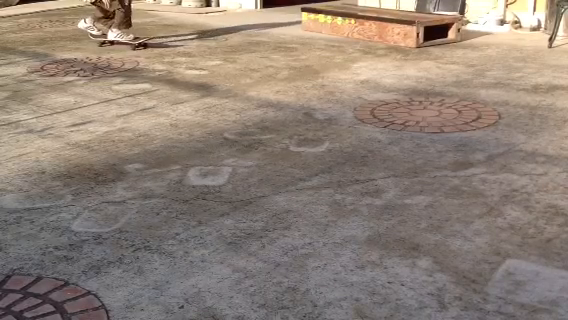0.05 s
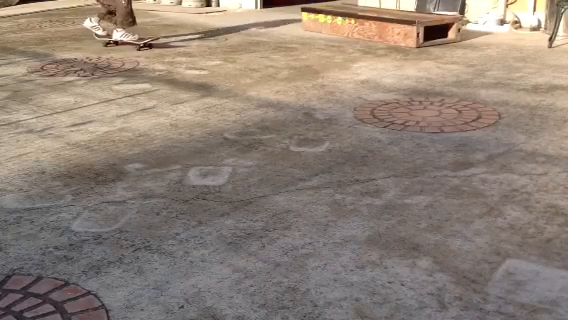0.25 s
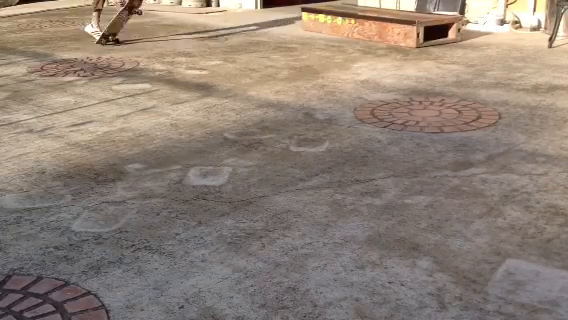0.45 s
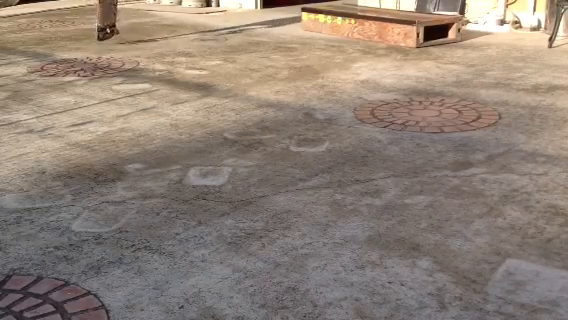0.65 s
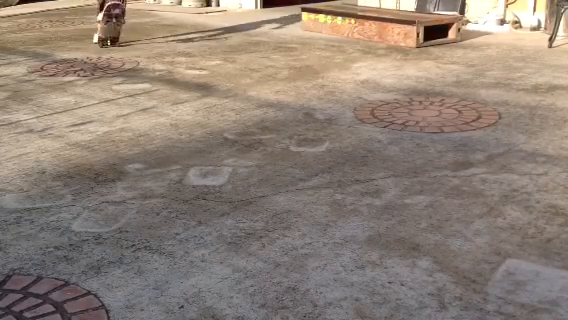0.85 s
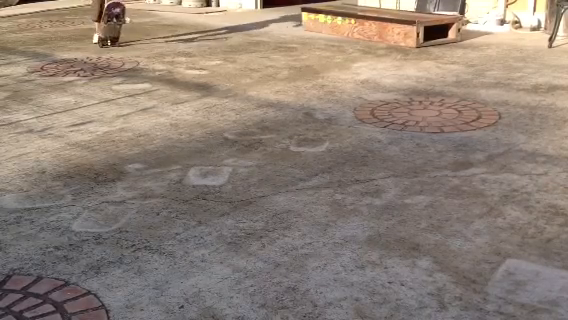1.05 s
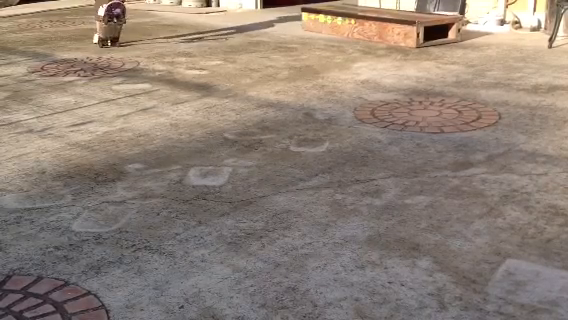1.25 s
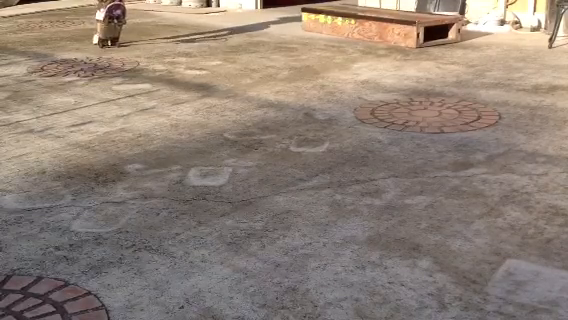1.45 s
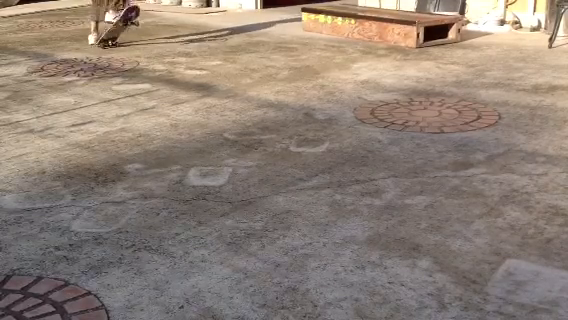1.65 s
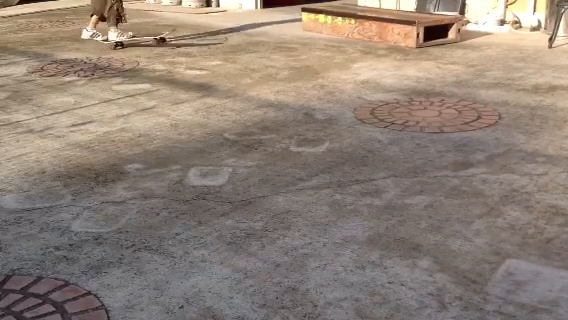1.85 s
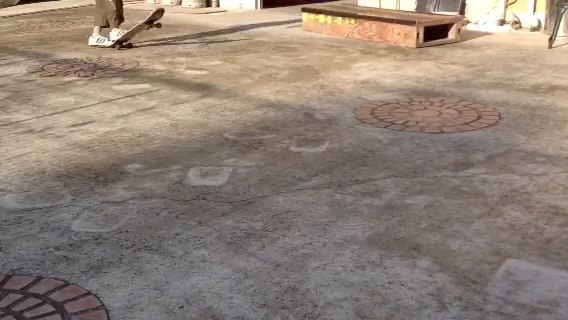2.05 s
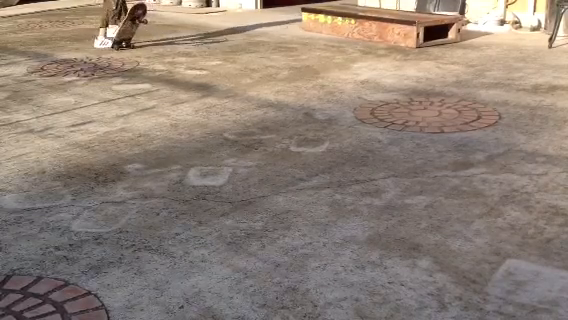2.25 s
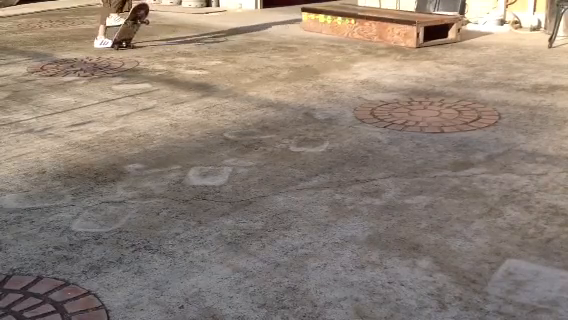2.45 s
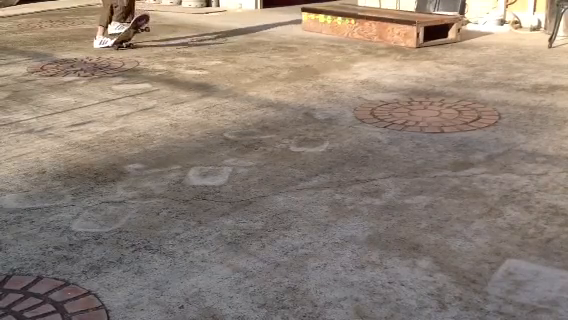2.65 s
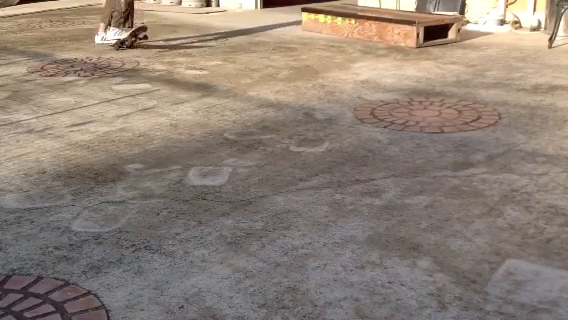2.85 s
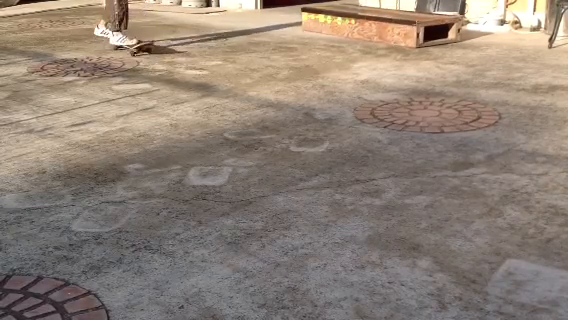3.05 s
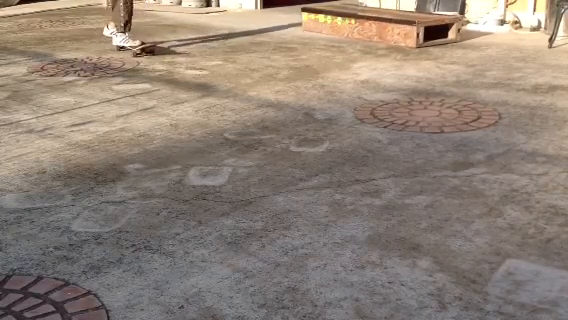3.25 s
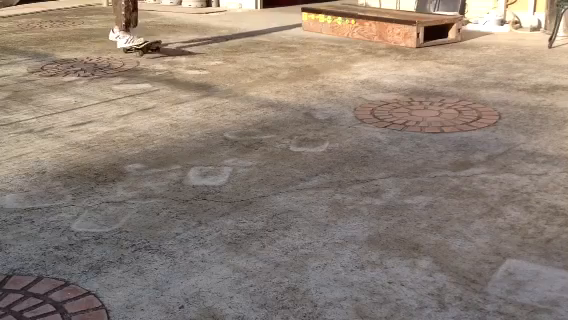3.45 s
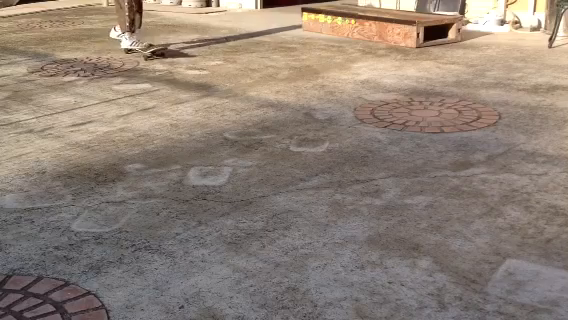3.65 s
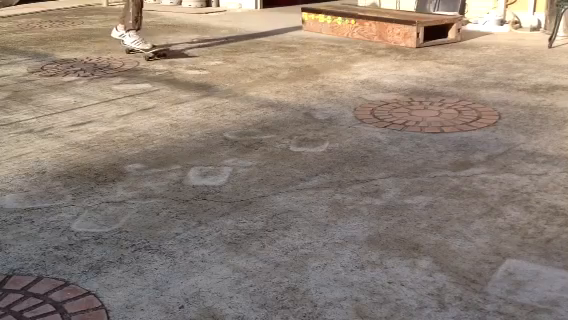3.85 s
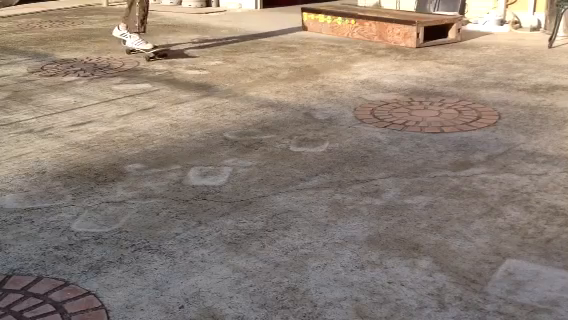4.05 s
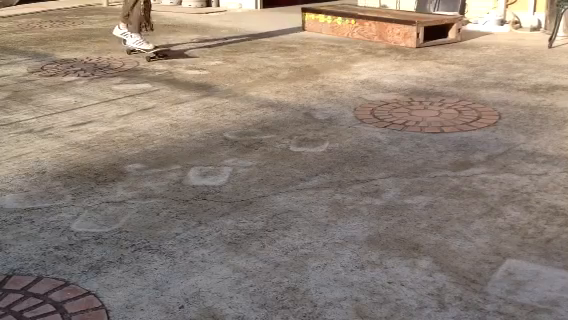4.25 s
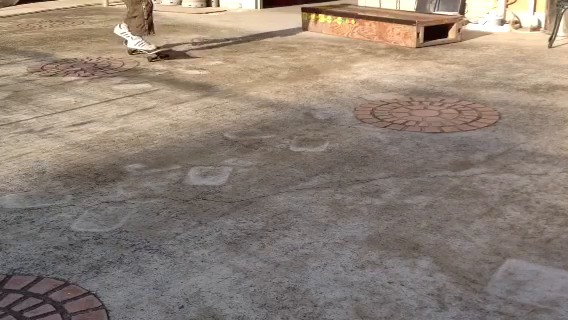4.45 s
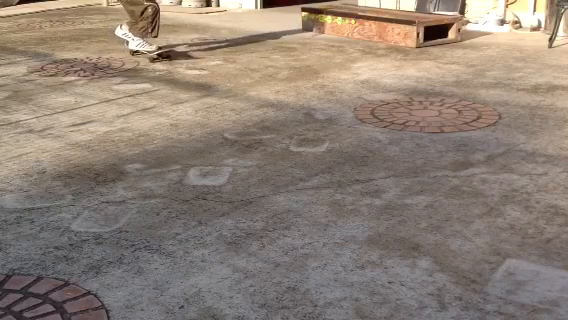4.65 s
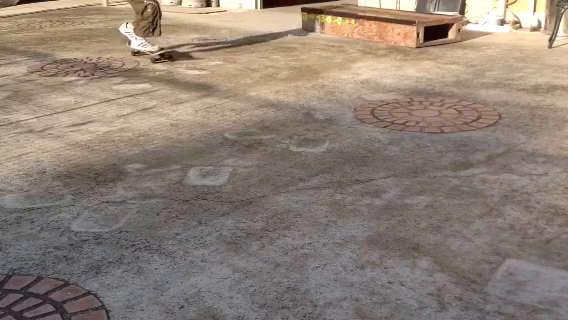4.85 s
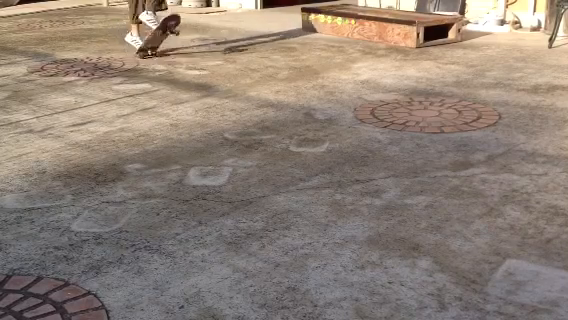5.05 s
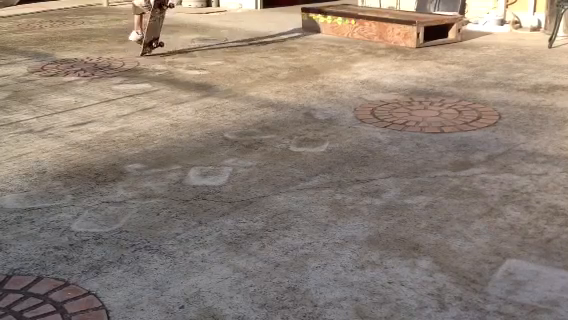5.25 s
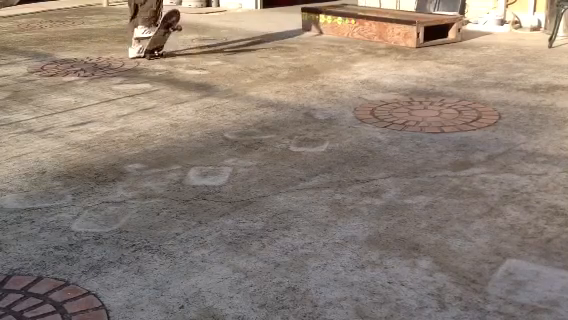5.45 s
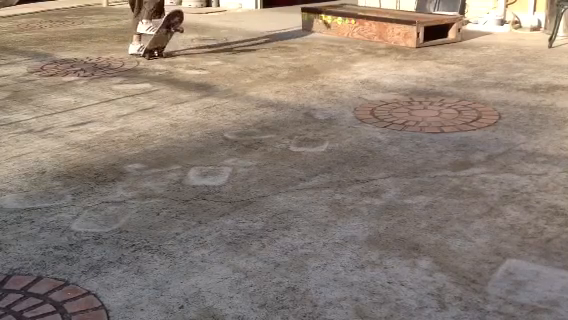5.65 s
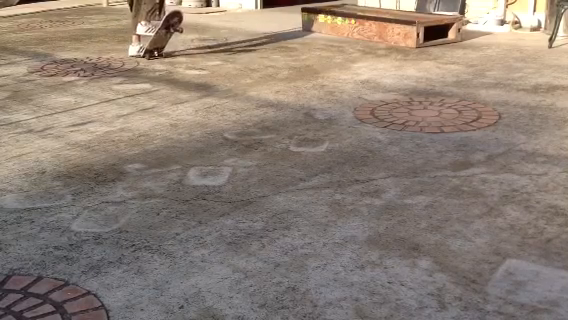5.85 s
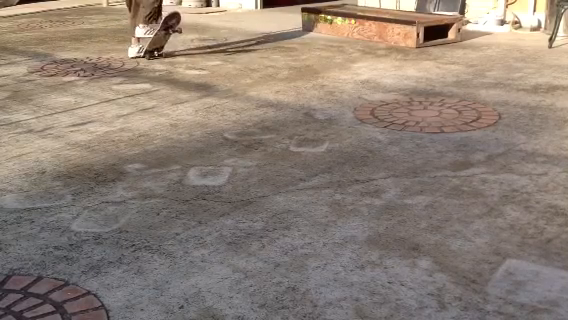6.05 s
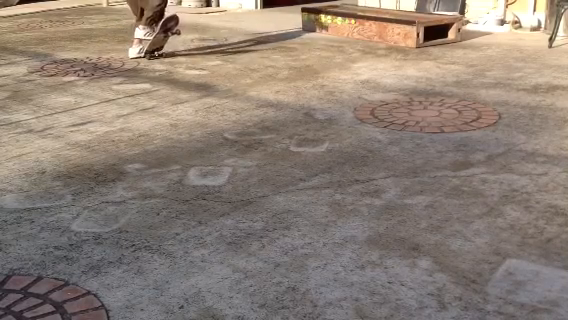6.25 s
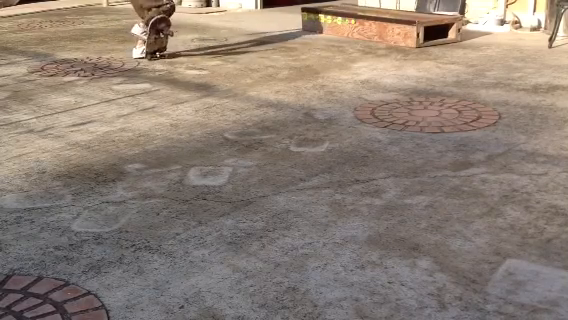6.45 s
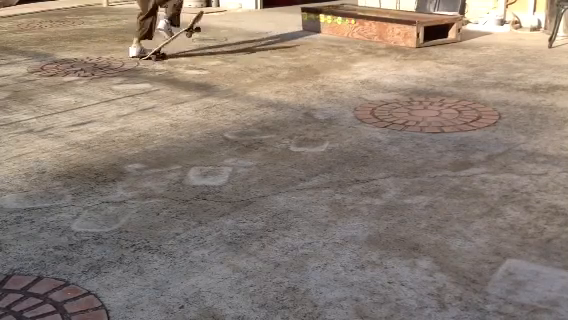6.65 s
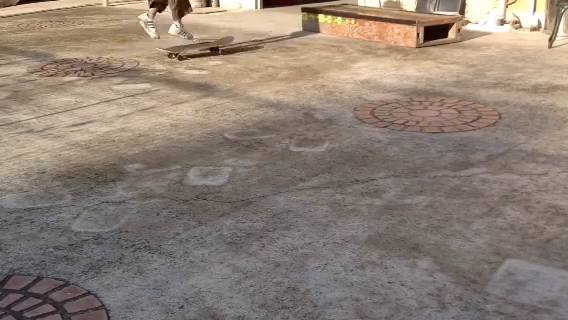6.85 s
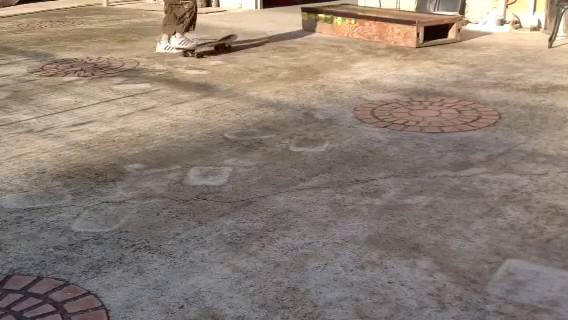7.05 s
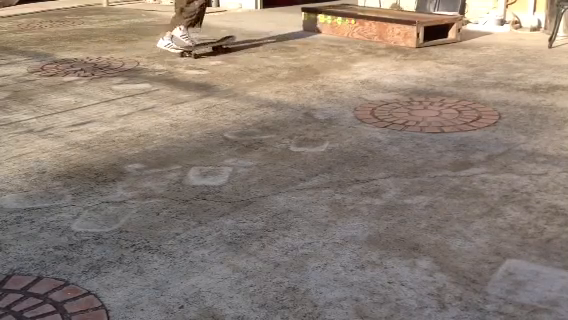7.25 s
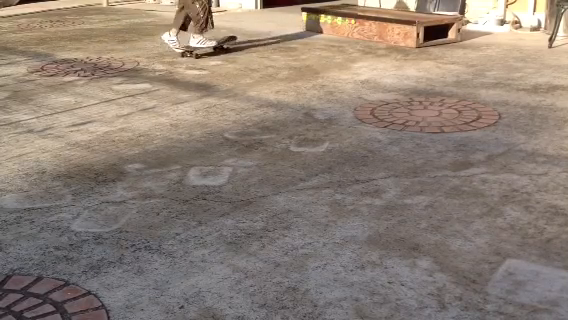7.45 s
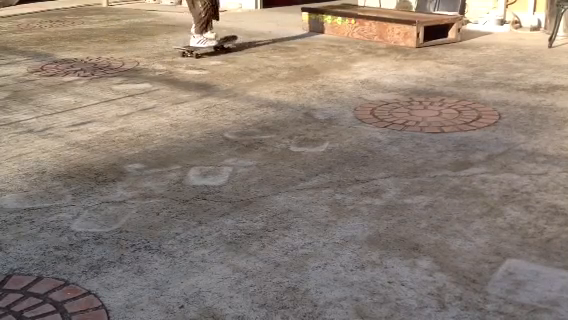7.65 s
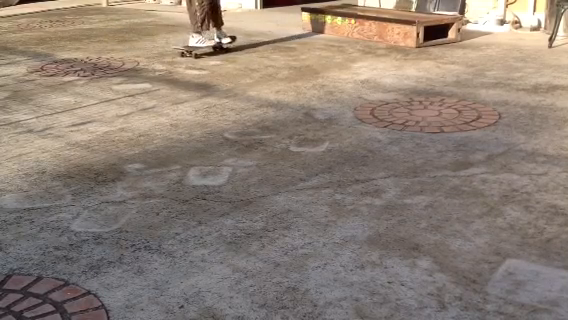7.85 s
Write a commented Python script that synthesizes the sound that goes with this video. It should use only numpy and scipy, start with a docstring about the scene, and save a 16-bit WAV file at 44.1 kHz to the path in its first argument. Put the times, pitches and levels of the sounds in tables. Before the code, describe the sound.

A skateboard slams on concrete in three bursts of hard wooden cracks, with shoe scuffs and small clacks between, over faint traffic and recorder whine.

```python
"""A disc drive whines and ticks over distant traffic; then shoes scuff and a skateboard slams on concrete.
The camcorder some metres away hears its own drive: tones and ticks under a resonance sweeping each disc turn.
Blows ring the deck's modes and rattle its metal trucks as filtered clicks; sparse taps make the after-sound.
Scuffs are clumped clicks, the squeak is a rough falling tone, traffic and hiss are shaped noise.
The recorder cuts bass, rides its gain, limits softly and cuts the top."""
import sys
import numpy as np
from scipy import signal
from scipy.fft import rfft, irfft
from scipy.io import wavfile
from scipy.ndimage import uniform_filter1d

SR = 44100
rng = np.random.default_rng(int(sys.argv[2]) if len(sys.argv) > 2 else 0)


def wrap_up_sound(samples):
    """Save the sound to the file named by the first command line argument, as 16-bit audio."""
    columns = np.atleast_2d(samples).T
    # keep every value between -1 and 1, then stretch to whole-number steps
    tamed = np.clip(columns, -1, 1)
    steps = np.round(tamed * 32767).astype(np.int16)
    wavfile.write(sys.argv[1], SR, steps)


N = 348831

# traffic and hiss spectrum: (frequency [Hz], relative density [dB per Hz])
FLOOR_SPECTRUM = [(18, -52), (30, -40.5), (164, 1), (359, -8), (467, -10), (546, -8.5), (808, -11.5),
                  (1230, -10), (3230, -15.5), (4420, -17), (5040, -12), (6370, -8.5), (9190, -18),
                  (14000, -14), (15500, -18.5)]
FLOOR_RMS_DB = -47.5  # before the recorder

# drive tones: (frequency at the reference motor speed [Hz], rms before WHINE_GAIN_DB and waver [dB])
WHINE_TONES = [(4716, -73), (5098, -71), (5480, -70), (5669, -78), (5862, -67), (5922, -76), (6067, -76),
               (6255, -68), (6288, -73), (6476, -75), (6611, -71), (6858, -78), (7047, -75), (7267, -80),
               (7445, -79), (7634, -80), (7827, -78), (8005, -78), (10008, -84), (10562, -83), (10772, -83),
               (10950, -82), (11326, -82), (11709, -83), (14137, -80), (14325, -78), (14519, -79),
               (14713, -79), (14906, -79)]
# motor speed, two ticks a turn; second row is the reference: (time [s], speed [turns/s])
MOTOR_SPEED = [(0, 188.33), (4.6, 190.7), (8, 192.45)]
# disc angle polynomial: (start [turns], speed [turns/s], quadratic term [turns/s^2])
DISC_ANGLE = (-.27, 14.97, .0115)
# motor tick spectrum: (frequency [Hz], relative density [dB per Hz])
TICK_SPECTRUM = [(4000, -41), (7800, -5), (10000, -30), (12500, -17), (14300, 0.5), (16000, -6.5)]
WHINE_GAIN_DB, TICK_RMS_DB = 4.0, -55.0
SWEEP_MID_HZ, SWEEP_SWING_HZ, SWEEP_WIDTH_HZ = 6440.0, 1300.0, 1100.0

# rubber slipping on the deck: (start [s], length [s], from [Hz], to [Hz], peak [dB])
SQUEAK = (6.552, 0.05, 1900, 1150, -47)

# soles and wheels scuffing: (start [s], rise [s], fall [s], top level [dB],
# treble relative to top [dB], rasp [Hz])
SCUFFS = [(0.2, 0.22, 0.088, -51, -18, 1220), (0.685, 0.029, 0.08, -32.5, -17, 990),
          (0.95, 0.09, 0.11, -48, -24, 1850), (1.39, 0.018, 0.1, -43, -27, 1320),
          (1.67, 0.039, 0.12, -46.5, -0.5, 1900), (1.76, 0.073, 0.017, -41.5, -18, 1000),
          (3.055, 0.02, 0.17, -42.5, -19, 1910), (3.25, 0.15, 0.23, -48, -25, 683),
          (4.86, 0.13, 0.32, -48, -17, 990), (5.26, 0.027, 0.2, -45, -13, 900),
          (5.573, 0.0098, 0.2, -44, -6, 1500), (6.522, 0.15, 0.23, -34, -6.5, 990),
          (6.76, 0.09, 0.18, -45.5, -17, 1000), (7.05, 0.3, 0.35, -49, -15, 900),
          (7.412, 0.015, 0.033, -37.5, -22, 920), (7.79, 0.022, 0.6, -52.5, -10, 710)]
# scuff spectra, into the deck and hissing above: (frequency [Hz], relative density [dB per Hz])
SCUFF_BODY = [(88, -54), (150, -14), (282, -12.5), (342, -42), (382, -11), (859, -8.5), (1410, -9),
              (4000, -21), (5200, -36), (8800, -120)]
SCUFF_TREBLE = [(1500, -49), (3000, -1), (5000, -1), (8000, -8), (11000, -13), (15000, -18)]
SCUFF_RANGE_DB = 21.5  # rise and fall span, apart from the short fade at the ends
RASP_DB, RASP_WIDTH = 5.5, 0.3  # lift; half-width in log frequency

# decay by band, before the wall fades: (frequency [Hz], t60 [s])
WALL_T60 = [(150, 0.47), (500, 0.46), (1500, 0.48), (4000, 0.43), (10000, 0.37)]
NEAR_WALL_S, FAR_WALL_S, ANSWER_S = 0.0058, 0.026, 0.0027  # arrivals; build-up
NEAR_FADE_S, FAR_FADE_S, FAR_DB = 0.042, 0.061, -9.5  # far relative to near
LOT_DB, LINGER_DB_PER_S, LINGER_FROM_S = -2, 72, 0.16  # scattered sound of the whole lot

# deck modes: (centre frequency [Hz], relative level before ring lift and scatter [dB], t60 [s])
DECK_MODES = [(180, -35, 0.02), (211, 2.5, 0.26), (311.7, 9, 0.12), (365, -5.5, 0.16), (513.5, 5.5, 0.15),
              (603, 6.5, 0.07), (721.5, -4.5, 0.24), (821, 6, 0.12), (1003, 18, 0.017), (1216, 16.5, 0.038),
              (1483, 3.5, 0.068), (1689, 15.5, 0.028), (1890, 9.5, 0.057), (2337, 5.5, 0.059),
              (2614, 1.5, 0.039), (3160, -2.5, 0.023), (3233, 4.5, 0.022), (3676, 0, 0.029),
              (4234, -2, 0.024), (4540, -84, 0.0073), (4810, -2, 0.017), (4930, -46, .01),
              (6800, -13, 0.033), (6400, -19, 0.0068)]
SPREAD_S = 0.0012  # longest bending-wave travel at 1 kHz; high tones run faster
ANGLE_BLUR = 0.075  # half-width of the spectral blur, share of frequency
RING_DB, RING_T60_S, RING_DELAY_S = -21, 0.21, 0.002  # one clear note, relative to the peak

# truck chatter spectrum: (frequency [Hz], relative density [dB per Hz])
RATTLE = [(2060, -12), (3500, -12.5), (4090, -9.5), (7340, -7.5), (7960, -9), (10400, -12), (15500, -19)]

# tail and wheels slammed on concrete; after-sound is how strongly each blow rumbles on:
# (time [s], knock peak [dB], loudest ring [Hz],
# then relative to the peak: thud [dB], crack [dB], rattle [dB], after-sound [dB])
SLAMS = [(0.486, -7, 553, -22, -10.5, -26, -3.5), (0.736, -2.5, 534, -22.5, -17.5, -35, -4.5),
         (0.808, 0.5, 1016, -30, -38, -31.5, -12), (1.841, -3.5, 660, -34, -19, -18, -5),
         (5.1202, -2.5, 1426, -25.5, -16, -32.5, -7), (5.382, -3.5, 497, -15, -22, -25.5, -12),
         (5.391, -9.5, 498, -9, -17.5, -23.5, -8), (5.48, -13.5, 1057, -46, -16.5, -25, -6),
         (6.909, -16, 1198, -38, -13, -17, 9), (6.922, -0.5, 666, -25, -22, -19.5, -3.5)]
# bounces and shoe taps; a loose deck thuds and rattles more than a held one:
# (time [s], knock peak [dB], loudest ring [Hz], looseness [dB], after-sound [dB])
TAPS = [(0.694, -33.5, 950, -15, 6), (0.768, -20, 990, -10, 0.5), (0.802, -13, 458, -20, -3.5),
        (0.865, -30.5, 900, -7.5, -20), (0.901, -22.5, 1030, -38, -24), (0.963, -24.5, 880, -43, -2),
        (1.028, -32.5, 1810, -30, 4.5), (1.053, -25.5, 1850, -21, -17), (1.192, -30, 880, -37, -8),
        (1.238, -33.5, 1840, -45, -0.5), (1.373, -38, 563, -32, 1), (1.403, -33.5, 1230, -37, -14),
        (1.5, -34, 729, -31, -11), (1.693, -36, 1850, -27, -9), (1.887, -15, 710, -18, -8.5),
        (1.999, -21, 564, -21, 4.5), (2.015, -22.5, 1220, -15.5, -2), (2.043, -27, 605, -16, -8),
        (2.165, -20.5, 905, -22.5, 0), (2.176, -22, 890, -20, -8), (2.203, -20, 436, -24, -10),
        (2.219, -23.5, 490, -30, -5), (2.355, -35.5, 1840, -29, -2), (2.386, -30, 1280, -33, -7.5),
        (2.456, -35.5, 1880, -33, -1.5), (2.586, -24.5, 526, -26, 2), (3.044, -26.5, 1230, -16.5, -13),
        (3.137, -31, 707, -14.5, -2.5), (3.286, -48.5, 596, -14.5, 19), (3.69, -26, 590, -20, -17),
        (3.703, -21.5, 1123, -17, -0.5), (3.91, -36, 1290, -59, -5), (4.22, -35.5, 1280, -18.5, -3),
        (4.949, -30, 500, -16, -2.5), (4.985, -30.5, 493, -20, 0), (5.257, -20.5, 542, -16.5, -0.5),
        (5.304, -18.5, 468, -25, -1), (5.345, -28, 850, -20, -21), (5.414, -15, 485, -19.5, -0.5),
        (5.567, -24.5, 1000, -17.5, -3.5), (5.588, -24, 1960, -35, -4), (5.961, -38, 834, -29, -12),
        (6.435, -29.5, 870, -26, -0.5), (6.465, -35, 1300, -26, -8), (6.974, -7.5, 727, -25, -14),
        (7.039, -20, 626, -19.5, 3.5), (7.431, -22, 1010, -17.5, 0), (7.465, -28, 488, -36, -3),
        (7.802, -39, 630, -12, 2)]
TAP_CRACK_DB, TAP_THUD_DB = -20.5, 1  # crack relative to peak; thud relative to looseness

EDGE_HZ = 15320  # recorder's upper band limit


def gain_of(db):
    """Decibels to an amplitude factor."""
    return 10 ** (np.asarray(db) / 20)


def evened(x):
    """Scales to rms 1."""
    return x / np.sqrt(np.mean(x ** 2) + 1e-20)


def read(points, hz):
    """Interpolates a spectrum table on a log frequency axis."""
    f, value = np.transpose(points)
    return np.interp(np.log(hz + 1), np.log(f + 1), value)


def add(mix, start_s, sound):
    """Mixes a sound in place from start_s, cut at the end of the mix."""
    part = mix[round(start_s * SR):][:len(sound)]
    part += sound[:len(part)]


def coloured(x, spectrum):
    """Filters by a spectrum table, then scales to rms 1."""
    hz = np.fft.rfftfreq(len(x), 1 / SR)
    return evened(irfft(rfft(x) * gain_of(read(spectrum, hz)), len(x)))


def grit(length, per_s, spread_db):
    """Sparse random clicks of uneven size."""
    size = gain_of(spread_db * np.minimum(rng.exponential(1, length), 4))
    hit = rng.random(length) < per_s / SR
    return size * rng.standard_normal(length) * hit


def floor():
    """Distant traffic and microphone hiss: shaped noise whose level drifts in time-frequency patches."""
    frames, hz = N // 256 + 5, np.fft.rfftfreq(1024, 1 / SR)
    real, imag, patches = rng.standard_normal((frames, 513, 3)).T
    patches = uniform_filter1d(patches, 10, 0)
    patches = evened(uniform_filter1d(patches, 16, 1))
    level_db = read(FLOOR_SPECTRUM, hz)[:, None] + 1.04 * patches
    noise = signal.istft((real + 1j * imag) * gain_of(level_db), nperseg=1024, noverlap=768)[1][:N]
    return gain_of(FLOOR_RMS_DB) * evened(noise)


def drive():
    """Whining tones lifted by a resonance that sweeps once a disc turn; motor ticks swell at its top."""
    t = np.arange(N) / SR
    motor_turns = np.cumsum(np.interp(t, *np.transpose(MOTOR_SPEED))) / SR
    disc_turns = np.polyval(DISC_ANGLE[::-1], t)
    swing = np.cos(2 * np.pi * (disc_turns + 0.02))
    sweep_hz = SWEEP_MID_HZ + SWEEP_SWING_HZ * swing
    reference_speed = MOTOR_SPEED[1][1]
    whine = np.zeros(N)
    for hz, rms_db in WHINE_TONES:
        waver = evened(uniform_filter1d(rng.standard_normal(N), 5000))
        turn_phase = 2 * np.pi * hz / reference_speed * motor_turns
        phase = turn_phase + 0.35 * waver + 2 * np.pi * rng.random()
        octave = 2 if hz > 9000 else 1  # the sweep also sounds an octave up
        detune = (hz / octave - sweep_hz) / SWEEP_WIDTH_HZ
        lift = evened(0.34 + np.exp(-detune ** 2))
        whine += np.sqrt(2) * gain_of(rms_db + 1.8 * waver) * lift * np.sin(phase)
    strong_ticks = np.exp(-(motor_turns % 1) / 0.18)
    weak_ticks = 0.51 * np.exp(-((motor_turns + 0.5) % 1) / 0.13)
    swelling = (strong_ticks + weak_ticks) * np.exp(1.3 * swing)
    ticks = coloured(swelling * rng.standard_normal(N), TICK_SPECTRUM)
    return gain_of(WHINE_GAIN_DB) * whine + gain_of(TICK_RMS_DB) * ticks


def squeak():
    """Rubber slips on the deck: a short rough tone that falls as it slows."""
    start_s, length_s, from_hz, to_hz, peak_db = SQUEAK
    out, t = np.zeros(N), np.arange(0, length_s, 1 / SR)
    glide_hz = from_hz * (to_hz / from_hz) ** (t / length_s)
    roughness = 0.34 * uniform_filter1d(rng.standard_normal(N), 60)[:len(t)]
    tone = np.sin(2 * np.pi * np.cumsum(glide_hz * (1 + roughness)) / SR)
    add(out, start_s, gain_of(peak_db) * np.sin(np.pi * t / length_s) * tone)
    return out


def scuffs():
    """Sand grains slip under rubber: clumped clicks into the deck, others hissing above."""
    out = np.zeros(N)
    clumps = gain_of(1.0 * evened(uniform_filter1d(rng.standard_normal(N), 400)))
    body = clumps * coloured(grit(N, 7000., 0.37), SCUFF_BODY)
    treble = clumps * coloured(grit(N, 9000., 0.81), SCUFF_TREBLE)
    for start_s, rise_s, fall_s, level_db, treble_db, rasp_hz in SCUFFS:
        length_s = rise_s + fall_s
        at = slice(round(start_s * SR), min(round((start_s + length_s) * SR), N))
        t = np.arange(at.stop - at.start) / SR
        press = np.clip(np.minimum(t / rise_s, (length_s - t) / fall_s), 0, 1)
        level = gain_of(level_db - SCUFF_RANGE_DB * (1 - press)) * np.minimum(10 * press, 1)
        low_hz, high_hz = rasp_hz * np.exp(-RASP_WIDTH), rasp_hz * np.exp(RASP_WIDTH)
        rasp = coloured(body[at], [(low_hz, 0), (rasp_hz, RASP_DB), (high_hz, 0)])
        out[at] += level * (rasp + gain_of(treble_db) * treble[at])
    return out


def walls():
    """Random-sign echoes that swell as each wall answers, each band dying at its own speed."""
    taps = np.zeros(SR // 2)
    slots = np.arange(0, len(taps) - 16, 16)
    taps[slots + rng.integers(0, 16, len(slots))] = rng.choice([-1., 1.], len(slots))
    hz, t, z = signal.stft(taps, SR, nperseg=256)
    band_decay = gain_of(-60 * t / read(WALL_T60, hz)[:, None])
    tail = signal.istft(z * band_decay, SR, nperseg=256)[1]
    t = np.arange(len(tail)) / SR
    near = np.clip((t - NEAR_WALL_S) / ANSWER_S, 0, 1)
    far = np.clip((t - FAR_WALL_S) / ANSWER_S, 0, 1)
    near_answer = near * np.exp(-(t - NEAR_WALL_S) / NEAR_FADE_S)
    far_answer = far * gain_of(FAR_DB) * np.exp(-(t - FAR_WALL_S) / FAR_FADE_S)
    lot = gain_of(LOT_DB + LINGER_DB_PER_S * np.maximum(t - LINGER_FROM_S, 0))
    tail = tail * (near_answer + far_answer + (near + far) / 2 * lot)
    return tail / np.linalg.norm(tail)


def all_round(x):
    """Energy leaves the deck on all sides: the blow's power spectrum blurred over frequency, zero phase."""
    summed, at = np.cumsum(abs(rfft(x)) ** 2), np.arange(len(x) // 2 + 1)
    reach = 1 + ANGLE_BLUR * at
    power = (np.interp(at + reach, at, summed) - np.interp(at - reach, at, summed)) / (2 * reach)
    return np.roll(irfft(np.sqrt(power)), 128)[:1024]  # pulse centred 128 samples in


def trucks(rattle_db):
    """Loose washers and bearings chatter after a blow: clicks under a two-rate decay."""
    t = np.arange(8192) / SR
    chatter = coloured(grit(len(t), 2500., 1.03), RATTLE)
    decay = gain_of(-60 * t / 0.056) + 0.42 * gain_of(-60 * t / 0.15)
    return gain_of(rattle_db) * chatter * decay


def deck(peak_db, ring_hz, thud_db, crack_db):
    """Struck plywood: decaying modes, each a cluster of five, loudest near ring_hz."""
    hz, db, t60_s = np.repeat(np.transpose(DECK_MODES), 5, axis=1)[:, :, None]
    t = np.arange(4096) / SR
    ring_lift_db = 11.1 * np.exp(-(np.log(hz / ring_hz) / 0.095) ** 2)
    db = db + ring_lift_db + 3.6 * rng.standard_normal(hz.shape)
    # the bending wave reaches each part a little later
    lag_s = SPREAD_S * np.sqrt(1000 / hz) * rng.uniform(0.3, 1, hz.shape)
    age = np.maximum(t - lag_s, 0)
    split_hz = hz * (1 + 0.088 * rng.uniform(-0.75, 1, hz.shape))
    rings = gain_of(db - 60 * age / t60_s) * np.sin(2 * np.pi * split_hz * age)
    centre_hz = hz[:, 0]
    thud = rings[centre_hz <= 400].sum(0)
    knock = rings[(centre_hz > 400) & (centre_hz <= 2000)].sum(0)
    crack = rings[centre_hz > 2000].sum(0)
    knock = signal.sosfilt(signal.butter(4, 420., "high", fs=SR, output="sos"), knock)
    thud = thud * np.minimum(t / 0.0012, 1)  # the whole deck takes time to flex
    first = slice(0, 440)  # thud and crack levels hold over the first 10 ms
    return (gain_of(peak_db) * knock / abs(knock).max()
            + gain_of(thud_db) * thud / thud[first].std()
            + gain_of(crack_db) * crack / crack[first].std())


def board():
    """Every blow, direct and with its after-sound; so small a board radiates no deep bass."""
    out = np.zeros(N)
    t = np.arange(6000) / SR
    taps = [(s, peak_db, ring_hz, loose_db + TAP_THUD_DB, TAP_CRACK_DB, loose_db, after_db)
            for s, peak_db, ring_hz, loose_db, after_db in TAPS]
    for s, peak_db, ring_hz, thud_db, crack_db, rattle_db, after_db in SLAMS + taps:
        metal = trucks(peak_db + rattle_db)
        wood = deck(peak_db, ring_hz, peak_db + thud_db, peak_db + crack_db)
        ring_level = gain_of(peak_db + RING_DB - 60 * t / RING_T60_S)
        add(metal, RING_DELAY_S, ring_level * np.sin(2 * np.pi * ring_hz * t))
        add(out, s, metal)
        add(out, s, wood)
        radiated = metal.copy()
        add(radiated, 0, all_round(wood))
        after_sound = signal.fftconvolve(radiated, walls())
        add(out, s, gain_of(after_db) * after_sound)
    return signal.sosfilt(signal.butter(6, 165., "high", fs=SR, output="sos"), out)


def scene():
    """Board and shoes on the lot, with the camcorder's own noise; one channel."""
    return (floor() + drive() + squeak() + scuffs() + board())[None]


def record(dry):
    """Bass cut, slow gain control that sinks after loud blows, soft ceiling, band limit."""
    cut = signal.sosfilt(signal.butter(2, 90., "high", fs=SR, output="sos"), dry)
    keep = np.exp(-1 / (1.5 * SR))  # loudness memory, 1.5 s
    power = signal.lfilter([1 - keep], [1, -keep], cut ** 2)
    loud_db = 10 * np.log10(power + 1e-12)
    ridden = cut * gain_of(-1.0 - 0.16 * np.maximum(loud_db + 41.5, 0))
    ceiling = 0.74
    limited = ridden / (1 + abs(ridden / ceiling) ** 4) ** 0.25
    band_limit = signal.firwin(2047, EDGE_HZ, window=("kaiser", 9), fs=SR)
    return signal.oaconvolve(limited, band_limit[None], "same")


dry = scene()
out = record(dry)
wrap_up_sound(out)
```